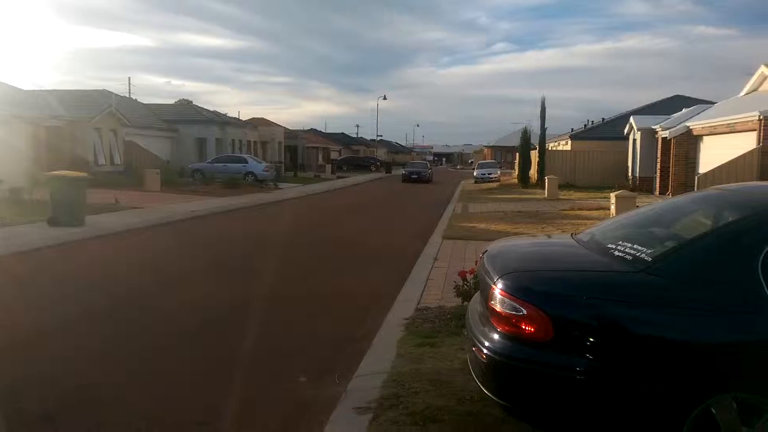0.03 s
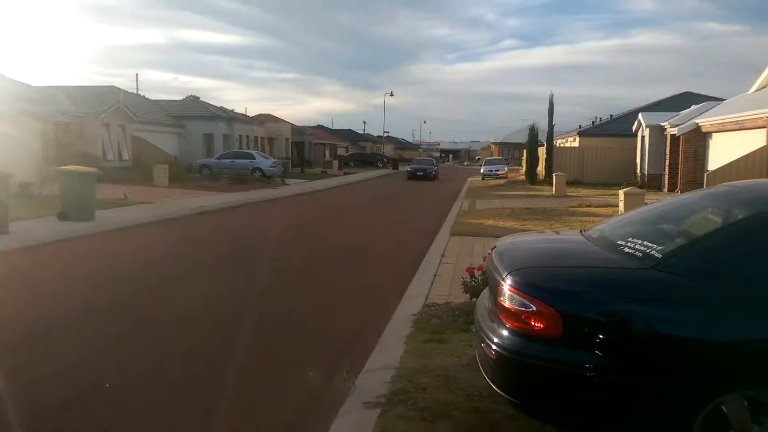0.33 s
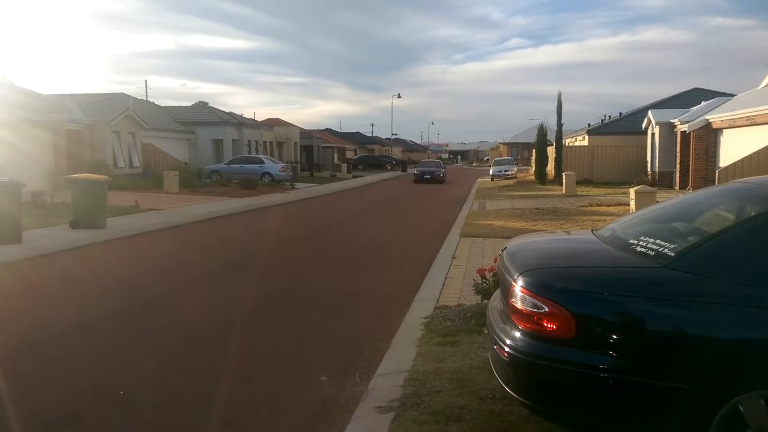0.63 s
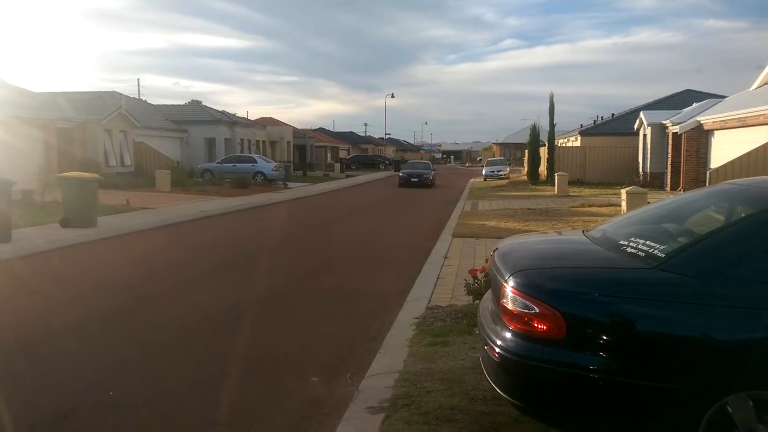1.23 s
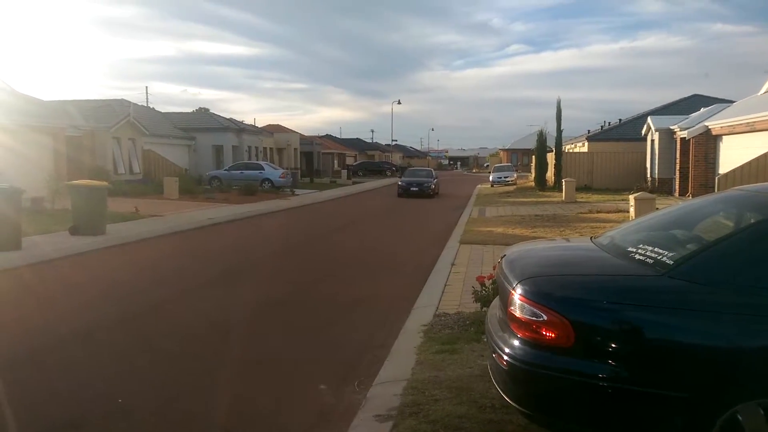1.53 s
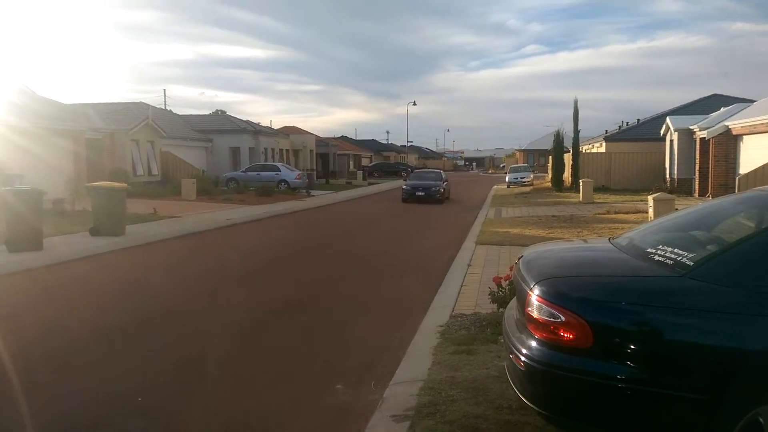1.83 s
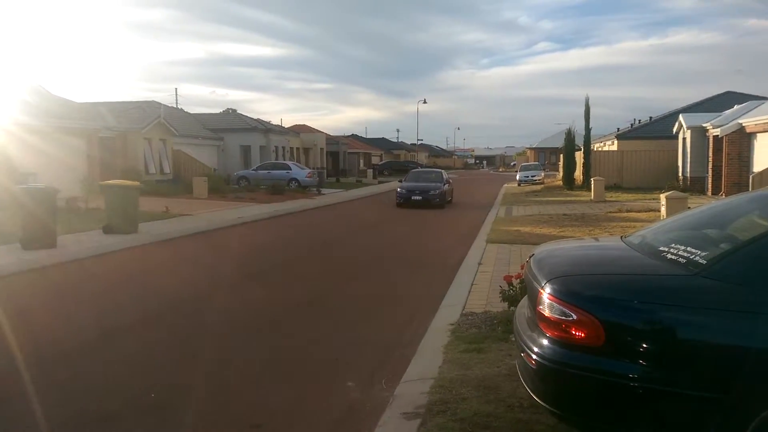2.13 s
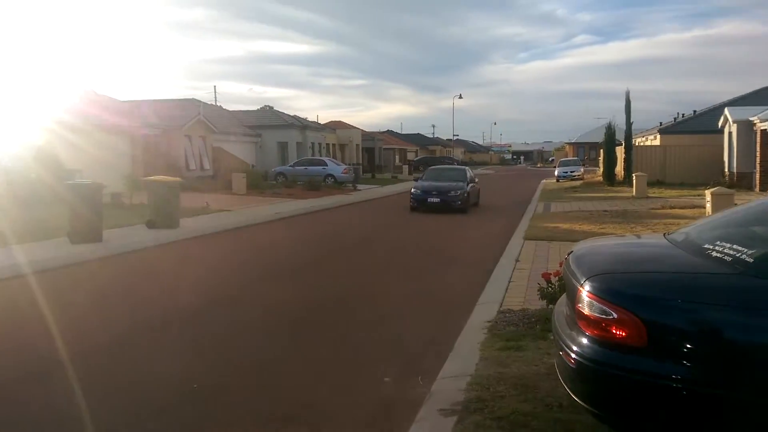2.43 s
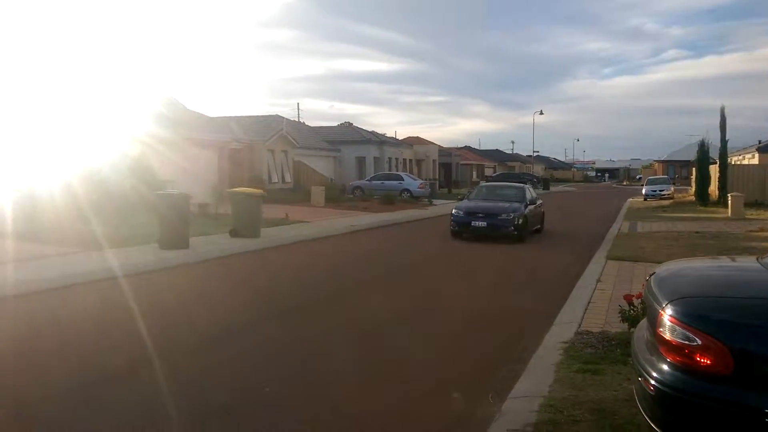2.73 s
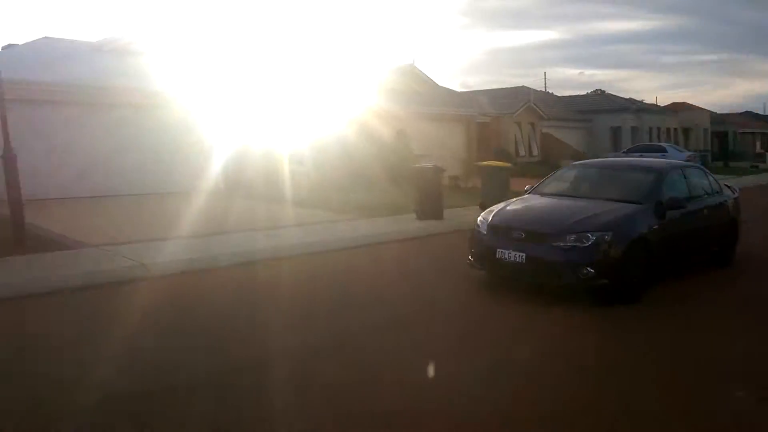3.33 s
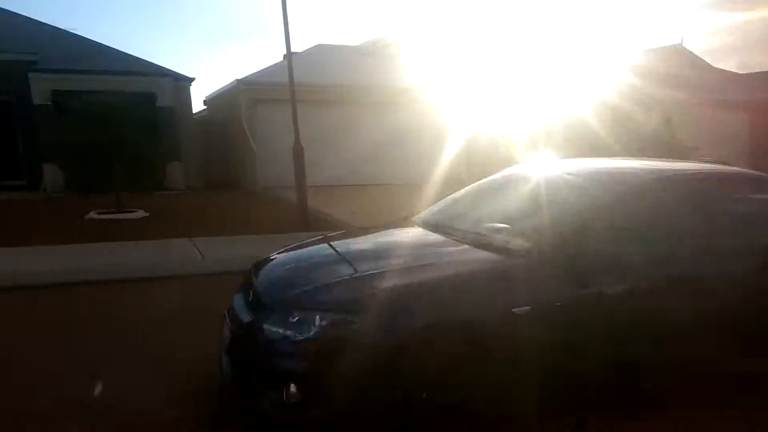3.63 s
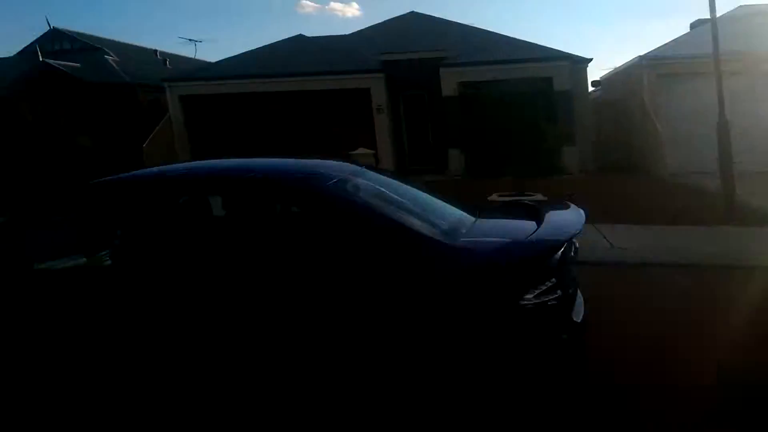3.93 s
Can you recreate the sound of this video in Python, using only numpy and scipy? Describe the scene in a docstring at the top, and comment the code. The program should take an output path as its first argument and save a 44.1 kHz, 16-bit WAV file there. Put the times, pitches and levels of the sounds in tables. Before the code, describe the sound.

A turbocharged car accelerates up a suburban street, faint at first, its exhaust note rising and a thin whistle joining around 1.5 seconds. Just after 2 seconds it changes gear with a short bark, a fluttering hiss and a low burble. Two brief high squeals come near 3 seconds. The revs climb again as tyre roar and microphone wind swell, loudest as it passes close around 3.8 seconds.

```python
"""A turbocharged six-cylinder car accelerates up a suburban street and passes close by.
Exhaust note and turbo whistle climb; at the gear change the engine barks, the blow-off valve hisses
and flutters and the exhaust burbles. The revs sag with two brief high squeals, then climb again
as tyre roar and wind swell. Nearby surfaces scatter the sound."""
import sys
import numpy as np
from scipy import signal
from scipy.fft import rfft, irfft, next_fast_len
from scipy.io import wavfile
from scipy.ndimage import map_coordinates

SR = 44100
rng = np.random.default_rng(int(sys.argv[2]) if len(sys.argv) > 2 else 0)


def bounce(signal):
    """Save signal as a 16-bit WAV file at the path given by the first command-line argument."""
    frames = np.transpose(np.atleast_2d(signal))
    limited = np.clip(frames, -1, 1)
    pcm = np.round(limited * 32767).astype(np.int16)
    wavfile.write(sys.argv[1], SR, pcm)


N = 176400

# Wind on the microphone. Each row: time in seconds, level in dB.
WIND_LEVEL = [(.07, -49), (.6, -41.5), (2.05, -43.5), (2.17, -31), (3.05, -43.5), (3.22, -30.5), (4, -20)]
# Engine and tyre rush. Each row: time in seconds, body level in dB, treble level in dB.
RUSH_LEVELS = [(.07, -66.5, -82), (.28, -52, -58), (.7, -47.5, -53.5), (1.1, -46, -48.5),
               (1.45, -39, -44.5), (2.04, -30, -39), (2.52, -33, -40), (3, -29.5, -36), (3.42, -23, -30.5),
               (3.6, -19.5, -26.5), (3.77, -17, -27.5), (3.86, -21, -24), (3.94, -28.5, -30),
               (4, -24.5, -24.5)]
# Noise spectra. Each row: frequency in Hz, relative density in dB.
WIND_SPECTRUM = [(15, -15), (60, -2), (130, 4.5), (700, -43.5)]
BODY_SPECTRUM = [(40, -16), (250, 7.5), (480, -3.5), (660, 1.5), (950, -9.5), (1300, -6.5), (1520, -9),
                 (1900, -8.5), (2400, -10), (5000, -57)]
TREBLE_SPECTRUM = [(1500, -2.5), (2800, 0.5), (5300, 0), (7000, -4), (9500, -7), (12500, -18),
                   (15500, -21.5)]
VENT_SPECTRUM = [(300, -10), (2200, 1.5), (3200, 0), (4100, 10.5), (5200, 0), (15500, -24)]
PUFF_SPECTRUM = [(4200, -2), (7000, -7), (9000, -16), (15500, -20)]
# Stereo width of the noise. Each row: frequency in Hz, left-right correlation.
EAR_CORRELATION = [(30, 0), (130, 0.97), (900, 0.5), (8000, 0)]
# Microphone port colour. Each row: frequency in Hz, left minus right in dB.
PORT_BALANCE = [(150, 0), (380, -2.5), (700, 1.5), (1290, 5), (2380, 5.5), (4400, -3), (6500, -5),
                (9000, 8)]

# Short notes. Each row: centre in seconds, pitch in Hz, level in dB, half length in seconds.
BARK_AND_SQUEAL_NOTES = [(2.185, 820, -24, 0.016), (2.949, 1770, -28, 0.0092), (3.048, 1743, -10.5, 0.0061)]
BURBLE_NOTES = [(2.194, 230, -20.5, 0.027), (2.295, 344, -23, 0.017), (2.365, 315, -21, 0.015),
                (2.432, 285, -26.5, 0.048), (2.52, 130, -28, 0.024), (3.99, 390, -15, 0.025)]
# Valve flutter. Each row: centre in seconds, level in dB, half length in seconds, chirp pitch in Hz.
VALVE_PUFFS = [(2.155, -36.5, 0.039, 9140), (2.266, -34, 0.024, 9000), (2.373, -34, 0.017, 8520),
               (2.461, -36.5, 0.011, 8130)]
# Turbo whistle, one table per gear. Each row: time in seconds, pitch in Hz, level in dB.
TURBO_SPOOLS = [
    [(1.5, 8060, -77), (1.62, 8450, -58.5), (1.85, 9650, -56), (2.07, 11300, -48), (2.16, 11900, -56)],
    [(2.55, 7450, -63), (2.72, 8650, -49), (2.92, 9750, -52), (3.35, 11150, -43), (3.68, 12200, -35),
     (3.86, 12300, -37)],
]

# Crank speed. Each row: time in seconds, turns per second.
CRANK_SPEED = [(0.1, 27.1), (0.42, 25.7), (0.72, 34.2), (1.0, 40.9), (1.55, 56.3), (2.1, 71.9),
               (2.25, 74.2), (2.5, 68.3), (2.63, 72.2), (2.85, 61.5), (3.1, 56.0), (3.32, 54.6),
               (3.5, 58.8), (3.68, 61.6), (3.88, 71.0), (4, 67.0)]
# Exhaust layers. Each row: time in seconds, level in dB.
FIRING_LEVEL = [(0.08, -58), (0.3, -33.5), (0.55, -29.5), (0.72, -26.5), (1.04, -32.5), (1.11, -27),
                (1.24, -23.5), (1.44, -30.5), (1.57, -18), (1.69, -28), (1.97, -25.5), (2.04, -16),
                (2.17, -27.5), (2.48, -34), (2.55, -24), (2.63, -21.5), (2.79, -23.5), (2.97, -22.5),
                (3.06, -16.5), (3.33, -18), (3.38, -8.5), (3.46, -22), (3.56, -18.5), (3.66, -11),
                (3.84, -11.5), (3.94, -23.5), (4, -10.5)]
OVERTONE_LEVEL = [(0.08, -56), (0.49, -42), (0.57, -30.5), (0.65, -40), (0.75, -30.5), (0.86, -37.5),
                  (1.05, -37), (1.26, -31.5), (1.37, -43), (1.56, -31.5), (1.85, -33.5), (2.1, -32),
                  (2.52, -42), (2.68, -27), (2.92, -30), (3.25, -21), (3.55, -21), (3.75, -27)]
GROWL_LEVEL = [(.1, -60), (1, -46.5), (2.05, -41.5), (2.5, -56), (2.6, -36), (2.95, -41), (3.58, -31),
               (3.8, -30.5), (3.885, -18.5), (3.95, -24.5)]  # bites as the throttle opens and the tailpipe passes
# Silencer pass band. Each row: frequency in Hz, gain in dB.
SILENCER_RESPONSE = [(125, -20.5), (175, 0), (230, 0), (285, 2.5), (325, -12.5), (460, -27)]
# Engine orders, in paired lists: multiples of crank speed, then their relative gains in dB.
WHINE_MULTIPLES = [29, 58, 88]
WHINE_GAINS_DB = [-10, -16, -16.5]
OVERTONE_MULTIPLES = [4, 5, 6]
OVERTONE_GAINS_DB = [-1.5, -2, 1]
GROWL_MULTIPLES = [6, 9, 10, 11, 12]
GROWL_GAINS_DB = [-0.5, -1, -9.5, -10.5, -4.5]

TIME_S = np.arange(N) / SR
NEAR_S = 2.89
NEARNESS = np.minimum(TIME_S / NEAR_S, 1) ** 2  # 0 far off, 1 close


def amp(db):
    """Decibels to gain."""
    return 10 ** (np.asarray(db) / 20)


def unit_rms(x):
    """Scale to rms 1."""
    return x / np.sqrt(np.mean(np.abs(x) ** 2) + 1e-20)


def at_hz(table, hz):
    """Interpolate (Hz, value) rows on a log axis."""
    knots_hz, values = np.transpose(table)
    return np.interp(np.log(hz + 1), np.log(knots_hz + 1), values)


def curves(table):
    """One per-sample curve for each column after the time."""
    knots_s, *columns = np.transpose(table)
    return [np.interp(TIME_S, knots_s, column) for column in columns]


def wobble(rate_hz):
    """Smooth random curve, rate_hz knots a second."""
    return map_coordinates(rng.standard_normal(4096), [TIME_S * rate_hz], mode='wrap')


def bell(centre_s, db, half_s):
    """Gaussian envelope."""
    return amp(db) * np.exp(-.5 * ((TIME_S - centre_s) / half_s) ** 2)


def filtered(x, response):
    """Zero-phase filter with gain response(hz)."""
    size = next_fast_len(N + SR // 2)
    return irfft(rfft(x, size) * response(np.fft.rfftfreq(size, 1 / SR)), size)[..., :N]


def stereo_noise(spectrum):
    """Shaped noise, alike in both ears near 130 Hz, wide in the treble."""
    def mid_side_gains(hz):
        spread = np.arccos(np.clip(at_hz(EAR_CORRELATION, hz), -1, 1)) / 2
        return amp(at_hz(spectrum, hz)) * [np.cos(spread), np.sin(spread)]
    mid, side = filtered(rng.standard_normal((2, N)), mid_side_gains)
    return np.array([mid + side, mid - side]) / np.std(mid)


def fuzzy_tone(hz, width_hz):
    """Narrow noise band around a fixed or moving pitch, one per ear."""
    i, q = filtered(rng.standard_normal((2, 2, N)), lambda f: 1 / (1 + (f / width_hz) ** 2))
    phase = 2 * np.pi * np.cumsum(hz * np.ones(N)) / SR
    return unit_rms(i * np.cos(phase) + q * np.sin(phase))


def crank_angle(jitter=0.00466):
    """Angle in radians of a slightly uneven crankshaft."""
    crank_hz, = curves(CRANK_SPEED)
    return 2 * np.pi * np.cumsum(crank_hz * (1 + jitter * wobble(40))) / SR


def engine_order(phase, rough, rate_hz, wide):
    """One engine partial, roughened by uneven combustion and scattered between the ears."""
    shake = lambda: wobble(rate_hz) + 1j * wobble(rate_hz)
    modulation = 1 + rough * shake() + wide * shake() * np.array([[1], [-1]])
    carrier = np.exp(1j * (phase + rng.uniform(0, 2 * np.pi)))
    return unit_rms(np.real(modulation * carrier))


def wind():
    """Rumble on the microphone, growing as the car arrives."""
    db, = curves(WIND_LEVEL)
    return amp(db) * stereo_noise(WIND_SPECTRUM)


def street(x, scatter_db=-9, decay_s=0.016, highpass_hz=756):
    """Road and nearby surfaces scatter and comb the treble."""
    delay_s = TIME_S[:SR // 10]
    impulse = rng.standard_normal((2, len(delay_s))) * np.exp(-delay_s / decay_s)
    scatter = signal.fftconvolve(x, impulse / np.linalg.norm(impulse[0]), axes=1)[:, :N]
    return x + amp(scatter_db) * filtered(scatter, lambda hz: hz ** 2 / (hz ** 2 + highpass_hz ** 2))


def rush(angle, throb_depth=0.052, flicker_db=0.94, far_corner_hz=5600):
    """Intake, exhaust gas and tyre noise, throbbing with the firings; air dulls it at a distance."""
    body_db, treble_db = curves(RUSH_LEVELS)
    throb = unit_rms(1 + throb_depth * np.cos(3 * angle) + throb_depth / 2 * np.cos(angle))
    bright = stereo_noise(TREBLE_SPECTRUM)
    dull = filtered(bright, lambda hz: 1 / (1 + (hz / far_corner_hz) ** 6))
    treble = dull + (0.03 + 0.96 * NEARNESS) * (bright - dull)
    flicker = amp(flicker_db * wobble(22.12))
    return throb * flicker * (amp(body_db) * stereo_noise(BODY_SPECTRUM) + amp(treble_db) * treble)


def whines(angle):
    """Thin whines, perhaps from gears and belt drive, rising out of the rush as the car nears."""
    _, treble_db = curves(RUSH_LEVELS)
    partials = sum(amp(db) * engine_order(k * angle, rough=.7, rate_hz=50, wide=.5)
                   for k, db in zip(WHINE_MULTIPLES, WHINE_GAINS_DB))
    return amp(treble_db) * NEARNESS * partials


def bark_and_squeals():
    """Short engine bark at the gear change, then two brief high squeals, perhaps clutch or tyres."""
    return sum(bell(centre_s, db, half_s) * fuzzy_tone(hz, width_hz=27)
               for centre_s, hz, db, half_s in BARK_AND_SQUEAL_NOTES)


def burble():
    """Ragged low exhaust notes off the throttle, in mono."""
    return sum(bell(centre_s, db, half_s) * fuzzy_tone(hz, width_hz=32)[0]
               for centre_s, hz, db, half_s in BURBLE_NOTES)


def blow_off(start_s=2.095, attack_s=.03, vent_db=-27.5, fall_db_per_s=37, chirp_db=-2):
    """Boost vents in a dying hiss and bright puffs, whose chirps fall as the compressor slows."""
    age_s = np.maximum(TIME_S - start_s, 0)
    envelope = np.minimum(age_s / attack_s, 1) * amp(vent_db - fall_db_per_s * age_s)
    out = envelope * stereo_noise(VENT_SPECTRUM)
    air = stereo_noise(PUFF_SPECTRUM)
    for centre_s, db, half_s, hz in VALVE_PUFFS:
        chirp = amp(chirp_db) * fuzzy_tone(hz, width_hz=780)
        out += bell(centre_s, db, half_s) * (air + chirp)
    return out


def turbo():
    """Compressor whistle, climbing as boost builds in each gear."""
    out = np.zeros((2, N))
    for spool in TURBO_SPOOLS:
        hz, db = curves(spool)
        spooling = (TIME_S > spool[0][0]) & (TIME_S < spool[-1][0])
        out += spooling * amp(db) * fuzzy_tone(hz, width_hz=240)
    return out


def exhaust(angle, waver_db=1.84):
    """Three firings a turn, overtones sweeping through the silencer band, and a high-order growl."""
    crank_hz, = curves(CRANK_SPEED)
    firing_db, = curves(FIRING_LEVEL)
    overtone_db, = curves(OVERTONE_LEVEL)
    growl_db, = curves(GROWL_LEVEL)
    out = amp(firing_db) * engine_order(3 * angle, rough=.2, rate_hz=26, wide=.1)
    for k, gain_db in zip(OVERTONE_MULTIPLES, OVERTONE_GAINS_DB):
        db = overtone_db + gain_db + at_hz(SILENCER_RESPONSE, k * crank_hz) + waver_db * wobble(10)
        out += amp(db) * engine_order(k * angle, rough=.27, rate_hz=25, wide=.12)
    for k, gain_db in zip(GROWL_MULTIPLES, GROWL_GAINS_DB):
        db = growl_db + gain_db + at_hz(BODY_SPECTRUM, k * crank_hz)
        out += amp(db) * engine_order(k * angle, rough=.7, rate_hz=45, wide=.35)
    return out


def scene():
    """The car in the street, plus wind."""
    angle = crank_angle()
    car = exhaust(angle) + whines(angle) + rush(angle) + turbo()
    car += blow_off() + burble() + bark_and_squeals()
    return street(car) + wind()


def record(dry):
    """Fade-in, two microphone ports of unlike colour, soft clip, band limit."""
    start_s, fade_s, ceiling, top_hz = 0.069, 0.098, .95, 15750
    faded = dry * np.clip((TIME_S - start_s) / fade_s, 0, 1)
    coloured = filtered(faded, lambda hz: amp(at_hz(PORT_BALANCE, hz) * np.array([[.5], [-.5]])))
    rounded = coloured / (1 + (coloured / ceiling) ** 8) ** (1 / 8)
    return filtered(rounded, lambda hz: hz < top_hz)


dry = scene()
out = record(dry)
bounce(out)
```